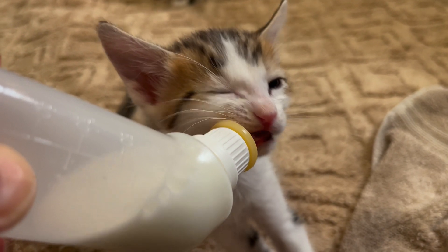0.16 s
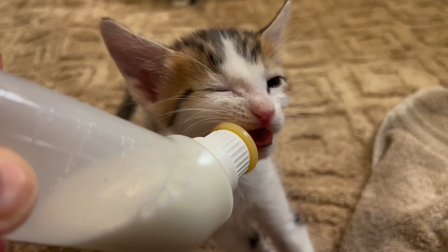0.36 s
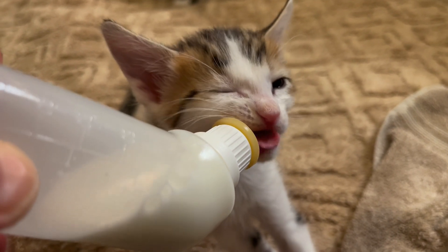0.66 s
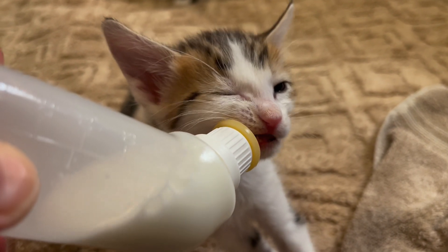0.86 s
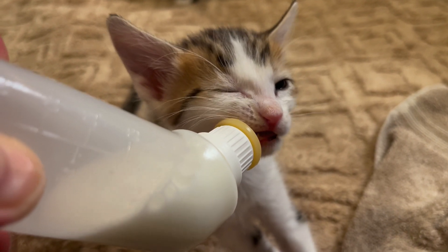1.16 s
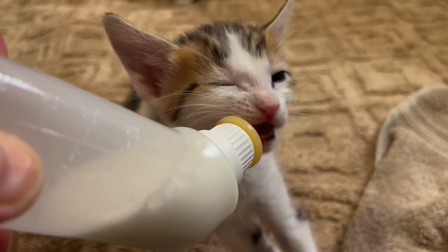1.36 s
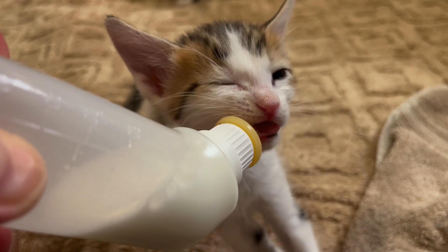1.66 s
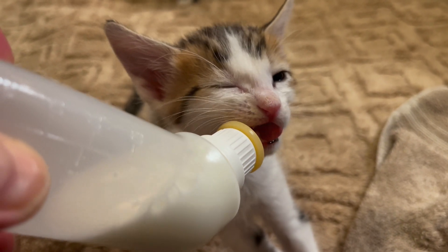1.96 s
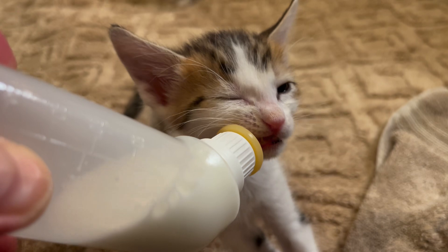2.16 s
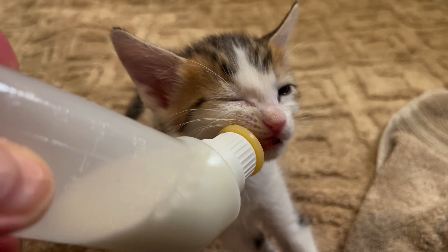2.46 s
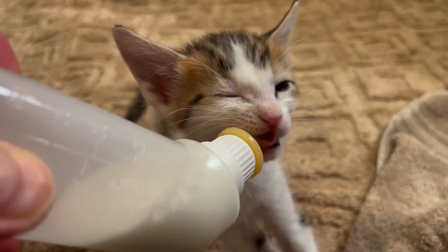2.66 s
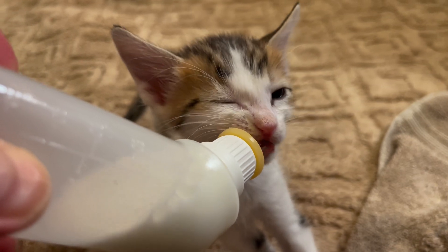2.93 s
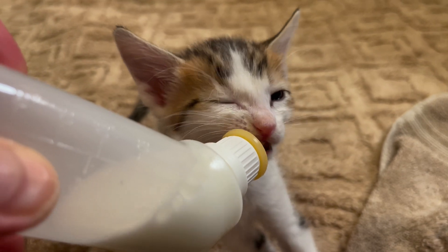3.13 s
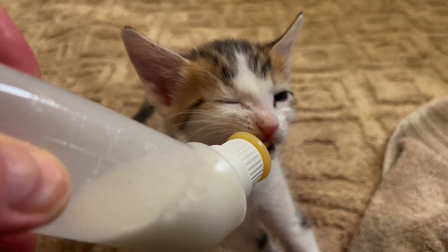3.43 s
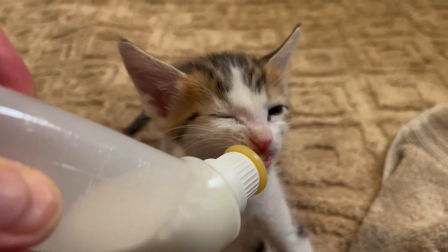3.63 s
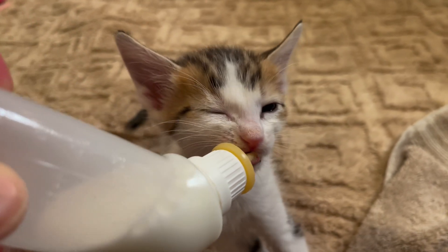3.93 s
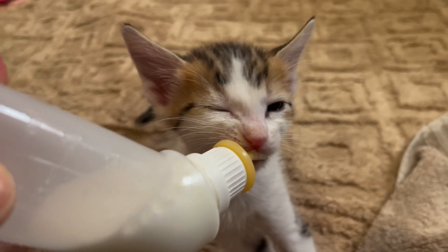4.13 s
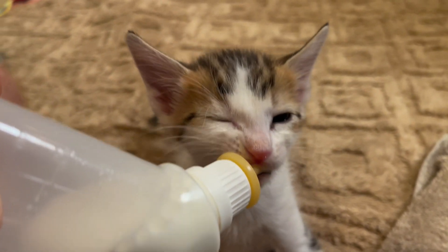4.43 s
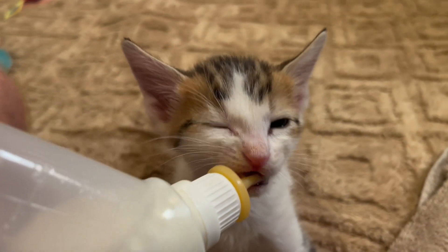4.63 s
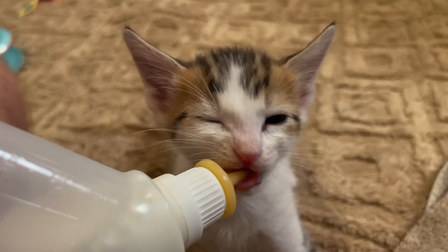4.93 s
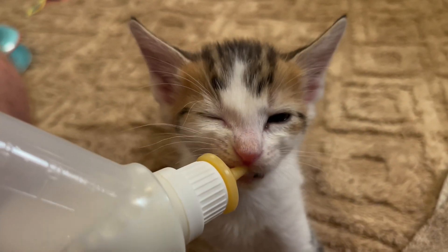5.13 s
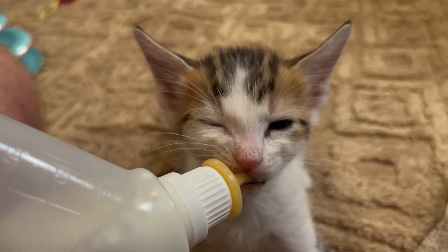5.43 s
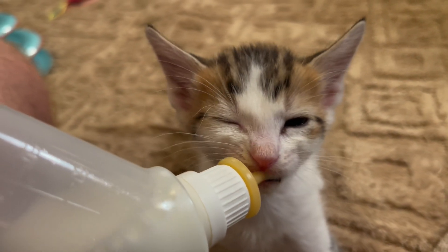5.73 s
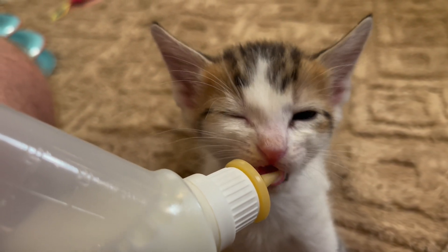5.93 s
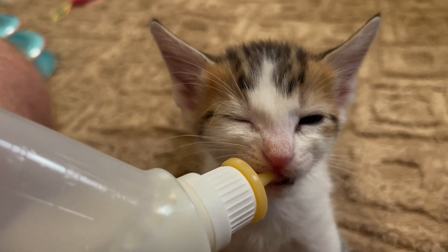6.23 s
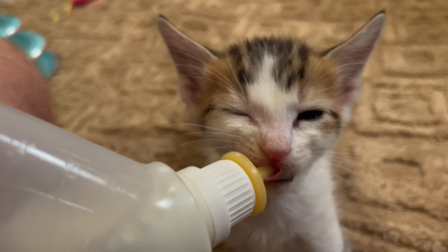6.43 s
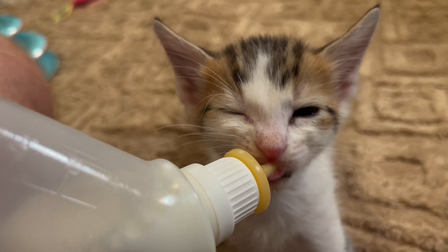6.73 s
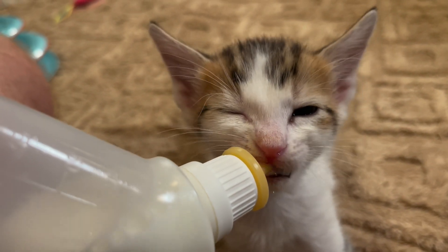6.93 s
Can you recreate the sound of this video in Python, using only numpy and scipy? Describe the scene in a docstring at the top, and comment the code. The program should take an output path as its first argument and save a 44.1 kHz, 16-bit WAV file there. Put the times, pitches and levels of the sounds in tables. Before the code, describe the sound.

Irregular bright lip snaps, brief wet squelches and small milky bubble pops from a nursing kitten, with faint handling rumble and appliance hum indoors.

```python
"""Kitten sucking on a rubber teat

Close to a two-port microphone, air squelches through the wet lips and their seal lets go with snaps.
Each burst rings lip gap, front and back of the mouth: shut lips click high and thin, parted lips let
the mouth sound. Smacks are falling rings, rubber pops and tongue bubbles short ones, squeaks narrow noise.
Sparse echoes follow; behind lie swells of handling noise, patchy room noise and an appliance's tones."""
import sys
import numpy as np
from scipy import signal
from scipy.fft import rfft, irfft, next_fast_len
from scipy.io import wavfile
from scipy.ndimage import uniform_filter1d

SR = 44100
rng = np.random.default_rng(int(sys.argv[2]) if len(sys.argv) > 2 else 0)


def dump(signal):
    """Clip the signal to [-1, 1] and save it as 16-bit WAV at the path in sys.argv[1]."""
    limited = np.clip(np.atleast_2d(signal).T, -1, 1)
    pcm = np.round(limited * 32767).astype(np.int16)
    wavfile.write(sys.argv[1], SR, pcm)


N = 312228
TIME = np.arange(N) / SR
HZ = np.fft.rfftfreq(N, 1 / SR)

# likeness of the diffuse sound at the two ports: (frequency [Hz], likeness [0-1])
PORT_LIKENESS = [(25, 0.54), (70, 0.4), (150, 0.8), (330, 0.7), (600, 0), (1700, 0.1), (2200, 0.3),
                 (5000, 0), (9000, 0.99)]
# each deeper cavity of the mouth answers a snap this much later
CAVITY_LAG_S = 0.0004
# ring of the rubber teat
TEAT_HZ = 3960


def amp(db):
    """Decibels to gain."""
    return 10 ** (np.asarray(db) / 20)


def unit(x):
    """Scales to an rms of 1."""
    return x / np.sqrt(np.mean(x ** 2) + 1e-20)


def read(points, hz):
    """Reads a table on a log-frequency axis."""
    f, value = np.transpose(points)
    return np.interp(np.log(hz + 1), np.log(f + 1), value)


def add(mix, s, sound):
    """Adds a sound to the mix at time s [s]."""
    part = mix[max(round(s * SR), 0):][:len(sound)]
    part += sound[:len(part)]


def drift(rate_hz):
    """Random wander of rms 1, mostly slower than rate_hz."""
    spectrum = rfft(rng.standard_normal(N))
    return unit(irfft(spectrum / (1 + (HZ / rate_hz) ** 4), N))


def thin(x, low_hz):
    """Takes away what lies below low_hz with a gentle high-pass."""
    sos = signal.butter(2, np.clip(low_hz, 100, 20000), "high", fs=SR, output="sos")
    return signal.sosfilt(sos, x)


def ring(hz, width, size=256):
    """A heavily damped cavity ring with a rounded start and energy 1; width in Hz."""
    t = np.arange(size) / SR
    wave = t ** 2 * np.exp(-np.pi * width * t) * np.sin(2 * np.pi * hz * t)
    wave = thin(wave, hz * 0.44)
    return wave / np.linalg.norm(wave)


def splinter(x, share, spread_s, count=6, size=400):
    """A wet film tears in steps: each burst is trailed by a few weaker ones, rms 1 over 2 ms."""
    at = rng.uniform(0.14, 1, count) * np.clip(spread_s, 0, (size - 1) / SR)
    sign = rng.choice([-1, 1], count)
    taps = np.zeros(size)
    taps[0] = 1
    taps[(at * SR).astype(int)] += share * sign * np.exp(-2 * at / spread_s)
    y = np.convolve(x, taps)
    return np.sqrt(0.002 * SR) * y / np.linalg.norm(y)


def cavities(strength_db, opening, lip_hz, front_hz, back_hz=2122, deepening=0.13, usual_db=-28):
    """(dB, Hz) of lip gap, front and back: the opening of the lips shares out the level."""
    # levels with the lips shut and parted: (lip gap [dB], front [dB], back [dB])
    shut_levels = [2, -24, -25]
    parted_levels = [-29, 1, -13.5]
    levels = [strength_db + shut + opening * (parted - shut)
              for shut, parted in zip(shut_levels, parted_levels)]
    # a hard sound reaches deeper: dB gained at the back for each dB above the usual strength
    levels[-1] += deepening * max(strength_db - usual_db, 0)
    return list(zip(levels, [lip_hz, front_hz, back_hz]))


def snaps(shares=(0.45, 0.7, 0.7), spread_s=0.0023, parted_narrowing=0.19):
    """The seal lets go: a burst rings three cavities in turn, with a throat knock and soft jaw thump."""
    # the seal lets go: (time [s], strength [dB], opening of the lips [0-1], lip gap [Hz],
    # front of the mouth [Hz])
    releases = [(0.0259, -16.5, 0.19, 10100, 5800), (0.0267, -15, 0.2, 10850, 6380),
                (0.1925, -35.5, 0.53, 9100, 7000), (0.3313, -21, 0.35, 10700, 5530),
                (0.333, -13.5, 0.06, 10860, 6900), (0.6166, -39, 0.33, 9860, 5900),
                (0.9593, -10, 0.16, 10930, 6460), (1.1324, -37.5, 0.34, 9800, 6550),
                (1.2755, -19, 0.13, 10750, 6400), (1.444, -43, 0.35, 8400, 5180),
                (1.5913, -33.5, 0.23, 10040, 5500), (1.6967, -25, 0, 11700, 6000),
                (1.914, -34, 0, 11000, 6840), (1.945, -33.5, 0.25, 9200, 5900),
                (1.955, -40, 0.5, 9600, 5530), (2.103, -36, 0.41, 9430, 6100), (2.336, -31, 0, 10700, 7000),
                (2.5943, -25, 0.16, 10060, 6960), (2.948, -48, 0.32, 10540, 6000),
                (3.3678, -28, 0.65, 10800, 6870), (3.373, -43, 0.6, 10000, 6800),
                (3.6234, -28, 0.34, 9470, 6800), (3.6897, -47, 0.58, 10000, 7000),
                (3.9305, -30, 0.01, 8050, 6480), (3.9345, -27.5, 0.2, 7840, 6480),
                (3.961, -34, 0.3, 6900, 6400), (3.968, -31, 0.63, 7760, 6120),
                (4.0962, -45.5, 0.24, 10800, 6500), (4.228, -29.5, 0.26, 10230, 7500),
                (4.588, -22.5, 0.56, 9970, 6950), (4.5905, -37, 0.5, 8200, 5500),
                (4.8548, -21.5, 0.22, 10220, 5900), (5.2514, -26, 0, 10200, 6500),
                (5.253, -22.5, 0.06, 10000, 6300), (5.547, -22.5, 0.59, 10400, 5700),
                (5.871, -31, 0, 9150, 6400), (5.8789, -33, 0.88, 9700, 7100),
                (6.161, -43.5, 0.1, 10500, 7100), (6.1964, -32, 0.2, 8800, 7400),
                (6.198, -31, 1, 8360, 6860), (6.43, -35.5, 1, 9700, 5270), (6.8558, -47, 0.3, 9000, 6200),
                (6.862, -18.5, 0.27, 10560, 6100), (7.0785, -11.5, 0.3, 9400, 6200)]
    # width of each cavity's ring with the lips shut: (lip gap [Hz], front [Hz], back [Hz])
    shut_widths = [2600, 3400, 2000]
    throat_hz, throat_width_hz, throat_db = 1320, 900, -50
    # the throat follows only a share of any change from the usual level at the back of the mouth
    throat_follows, usual_back_db = 0.77, -48.5
    jaw_hz, jaw_width_hz, jaw_db = 480, 600, -39
    out = np.zeros(N)
    for s, strength_db, opening, lip_hz, front_hz in releases:
        mouth = cavities(strength_db, opening, lip_hz, front_hz)
        # parted lips narrow the rings
        narrowing = np.clip(1 - parted_narrowing * opening, 0.3, 1.5)
        for depth, ((db, hz), width, share) in enumerate(zip(mouth, shut_widths, shares)):
            burst = splinter(ring(hz, width * narrowing), share, spread_s)
            add(out, s + depth * CAVITY_LAG_S, amp(db) * burst)
        back_db = mouth[-1][0]
        knock_db = throat_db + throat_follows * (back_db - usual_back_db)
        knock = splinter(ring(throat_hz, throat_width_hz), 0.6, spread_s)
        add(out, s + 2 * CAVITY_LAG_S, amp(knock_db) * knock)
        thump = splinter(ring(jaw_hz, jaw_width_hz), 0.2, spread_s)
        add(out, s, amp(strength_db + jaw_db) * thump)
    return out


def squelches(trim_db=(-1.0, -1.0, -2.5), teat_db=-22.5, fade_s=0.0018, count=700):
    """Air leaks past the teat: a dense run of bursting films rings cavities and rubber, gliding."""
    # leaks: (start [s], length [s], growth [dB], strength [dB], opening of the lips [0-1],
    # lip gap [Hz], front of the mouth [Hz], fall in pitch [share, negative rises])
    leaks = [(1.128, 0.12, -19, -53, 0.41, 8700, 6170, 0.14),
             (1.2697, 0.0082, -4, -22.5, 0.22, 9800, 6770, 0.16),
             (1.591, 0.011, -5, -39, 0.29, 10100, 5900, 0.25),
             (1.6937, 0.0043, 0, -26.5, 0.05, 10320, 6500, 0.25),
             (1.899, 0.016, 8, -36, 0.18, 10460, 6720, 0.053),
             (1.913, 0.05, -16, -36.5, 0.2, 10550, 6860, 0.12),
             (2.33, 0.0055, 15, -32.5, .03, 9630, 7060, 0.051),
             (2.5923, 0.0038, -3, -24.5, 0.28, 9700, 6800, 0.088),
             (3.081, 0.048, -11, -64.5, 0.45, 8400, 5500, 0.13),
             (3.3653, 0.0063, 0.5, -28, 0.48, 10180, 6870, .1),
             (3.9261, 0.042, -2, -32, 0.29, 7480, 6500, 0.2),
             (4.573, 0.015, 20, -35.5, 0.7, 8870, 6740, -0.23),
             (4.8495, 0.003, 3.5, -32, 0.54, 10200, 5800, 0.22),
             (5.229, 0.027, 14.5, -30.5, 0.05, 9850, 6640, 0.15),
             (5.5387, 0.0074, 3, -27.5, 0.42, 10300, 6650, 0.08),
             (5.852, 0.029, 2.5, -32.5, 0.12, 9380, 6500, 0.089),
             (5.877, 0.015, -10, -37, 0.37, 9170, 6320, 0.091),
             (6.1594, 0.043, 8.5, -33, 0.4, 8900, 6900, 0.2),
             (6.424, 0.0086, 6, -33.5, 0.69, 9130, 5100, .18),
             (6.86, 0.0026, 3, -20.5, 0.23, 10000, 6430, 0.027)]
    # ring widths: (lip gap [Hz], front [Hz], back [Hz], rubber teat [Hz], fizz of milk [Hz])
    leak_widths = [2700, 2700, 2400, 1700, 1700]
    fizz_db, parted_fizz_db, fizz_hz = -10, -14, 11200
    median_gap_s, uneven_db, scatter = 1 / 4200, 4.3, 0.06
    out = np.zeros(N)
    for start, length, growth_db, strength_db, opening, lip_hz, front_hz, sag in leaks:
        length = max(length, 0.002)
        step, size, *detune = rng.standard_normal((count, 7)).T
        # each burst's place in the run, from 0 at its start to 1 at its end
        place = np.cumsum(np.exp(0.56 * step)) * median_gap_s / length
        place = place - place[0]
        within = place < 1
        place = place[within]
        # swells in from about a quarter of full level, and dies out the same way
        fade = np.minimum(0.26 + np.minimum(place, 1 - place) * length / fade_s, 1)
        strength = fade * amp(growth_db * place + uneven_db * size[within])
        t = np.arange(int(length * SR) + 128) / SR
        age = np.maximum(t - length * place[:, None], 0)
        mouth = cavities(strength_db, opening, lip_hz, front_hz)
        rings = [(db + trim, hz) for (db, hz), trim in zip(mouth, trim_db)]
        rings.append((strength_db + teat_db, TEAT_HZ))
        rings.append((strength_db + fizz_db + opening * parted_fizz_db, fizz_hz))
        for (db, hz), width, off in zip(rings, leak_widths, detune):
            pitch = hz * np.exp(scatter * off[within] - sag * (place - 0.5))[:, None]
            bursts = age ** 2 * np.exp(-np.pi * width * age) * np.sin(2 * np.pi * pitch * age)
            run = thin(strength @ bursts, hz * 0.5)
            # db is the level over the length of the leak, without the last ring-out
            add(out, start, amp(db) * np.sqrt(length * SR / len(run)) * unit(run))
    # soft wet films do not reach the very top of the treble
    return signal.sosfilt(signal.butter(8, 12500, fs=SR, output="sos"), out)


def smacks(from_hz=3600, to_hz=850, fall_s=0.0011, decay_s=0.0009):
    """The mouth comes open with a low smack: its ring drops quickly as the cavity grows."""
    # smacks: (time [s], level [dB])
    openings = [(0.0261, -40), (0.3346, -46.5), (2.5957, -54.5), (3.3735, -44), (3.9682, -41), (4.591, -47),
                (4.856, -48), (5.2542, -49.5), (5.5486, -62), (6.1992, -54), (6.433, -52), (6.864, -44)]
    out = np.zeros(N)
    t = np.arange(SR // 100) / SR
    hz = to_hz + (from_hz - to_hz) * np.exp(-t / fall_s)
    wave = t * np.exp(-t / decay_s) * np.sin(2 * np.pi * np.cumsum(hz) / SR)
    for s, db in openings:
        add(out, s, amp(db) * splinter(wave, 0.16, 0.0026))
    return out


def teat(width_hz=800):
    """The rubber teat springs back on the hardest snaps with short damped pops."""
    # pops: (time [s], level [dB])
    pops = [(0.0251, -41), (0.3333, -40), (0.9586, -32.5), (1.277, -41), (2.5943, -50)]
    out = np.zeros(N)
    for s, db in pops:
        add(out, s, amp(db) * splinter(ring(TEAT_HZ, width_hz), 0.1018, 0.001))
    return out


def tongue(width_share=0.81, round_below_hz=2700, count=110):
    """Single bubbles pop around the tongue, low ones rounder, over a faint random crackle of milk."""
    # clearest bubbles, between sucks or with a hard snap: (time [s], level [dB], pitch [Hz])
    bubbles = [(0.0262, -34.5, 2220), (.149, -57, 4200), (.265, -45.5, 2020), (0.3336, -44.5, 1400),
               (.462, -64, 4000), (.502, -56.5, 6500), (0.54, -62, 6830), (.569, -61, 4200),
               (0.6618, -55, 6110), (0.84, -59, 5660), (.912, -62, 3900), (0.9603, -42, 1700),
               (1.01, -47.5, 2346), (1.515, -57.5, 2920), (1.749, -56, 9530), (1.764, -54.5, 10500),
               (1.985, -60, 11000), (2.065, -63, 4400), (2.074, -55, 4300), (2.187, -60.5, 2210),
               (2.43, -59, 3830), (2.498, -56, 10550), (2.682, -55.5, 2360), (2.778, -64, 4400),
               (2.804, -57, 4690), (3.339, -63.5, 10450), (3.4862, -54.5, 8300), (3.6864, -43.5, 1890),
               (4.105, -57.5, 6000), (4.148, -52, 3150), (4.425, -58.5, 2595), (4.476, -60, 3000),
               (4.588, -44.5, 3630), (4.699, -60, 9060), (4.762, -62.5, 3910), (5.048, -62.5, 7430),
               (5.121, -50, 2720), (5.389, -59.5, 6680), (5.94, -61.5, 7555), (6.562, -65, 3680),
               (6.63, -59.5, 10500), (6.693, -59, 2960), (6.757, -58.5, 8500), (6.864, -50.5, 7400),
               (6.938, -62.5, 6300), (7.006, -64.5, 4070), (7.027, -57.5, 2590)]
    crackle_db, uneven_db = -77.0, 5.5
    low_hz, high_hz, crackle_width_hz = 3500, 11000, 3200
    out = np.zeros(N)
    for s, db, hz in bubbles:
        width = width_share * hz * min(hz / round_below_hz, 1)
        add(out, s, amp(db) * splinter(ring(hz, width), 0.7, 0.0075))
    for when, pitch, size in rng.random((count, 3)):
        hz = low_hz * (high_hz / low_hz) ** pitch
        tick = splinter(ring(hz, crackle_width_hz), 0.49, 0.0056)
        # a few ticks stand well above the rest
        add(out, when * N / SR, amp(crackle_db - uneven_db * np.log(size + 0.041)) * tick)
    return out


def squeaks(sag=0.04):
    """Faint whistly squeaks from the muzzle: narrow noise that sputters and sinks a little in pitch."""
    # squeaks: (start [s], length [s], level before sputter [dB], middle pitch [Hz])
    whistles = [(0.189, 0.11, -74, 5200), (0.404, 0.084, -77, 5520), (0.578, 0.024, -77.5, 7060),
                (1.134, .06, -66.5, 5260), (2.337, .076, -70, 5250), (2.924, 0.067, -74.5, 3360),
                (3.086, 0.14, -75.5, 5150), (3.409, 0.16, -70.5, 4880), (4.306, 0.042, -78, 5940),
                (4.461, 0.015, -72, 5640), (4.916, 0.066, -69.5, 4840), (5.313, 0.016, -68.5, 6400),
                (5.504, 0.025, -68, 4860), (5.683, 0.053, -68.5, 4930), (6.379, 0.049, -68.5, 5200)]
    out = np.zeros(N)
    smooth = signal.butter(2, 330, fs=SR, output="sos")
    sputter = unit(amp(4 * drift(150)))
    for s, length, db, hz in whistles:
        u = np.linspace(0, 1, int(length * SR))
        fuzz = signal.sosfilt(smooth, rng.standard_normal((len(u), 2)) @ [1, 1j])
        turn = np.exp(2j * np.pi * np.cumsum(hz * (1 - sag * (u - 0.5))) / SR)
        swell = np.sin(np.pi * np.sqrt(u))
        add(out, s, amp(db) * unit((fuzz * turn).real * swell))
    return out * sputter


def match_ports(z, hz):
    """Mixes some of the left port's noise into the right, as alike as the table says."""
    same = np.clip(read(PORT_LIKENESS, hz), 0, 1)[:, None]
    z[1] = same * z[0] + np.sqrt(1 - same ** 2) * z[1]


def room(x, gap_s=0.002, lumpy_db=3, near_db=4, near_s=0.022):
    """Sparse clumped echoes, strongest from nearby things; bands die apart and carpet soaks up the top."""
    # echo: (frequency [Hz], time to fall by 60 dB [s], relative starting level [dB])
    echo_bands = [(497.3, 0.24, 1.5), (2200, 0.26, -1), (4005, 0.2, 1), (7156, 0.23, -0.5),
                  (8800, 0.34, 0.5), (10300, 0.18, -5.5), (11440, 0.27, -5), (14000, 0.13, -10.5)]
    t = TIME[:SR]
    taps = rng.choice([-1.0, 1.0], (2, SR)) * (rng.random((2, SR)) < 0.15) * (t > gap_s)
    taps = taps * amp(lumpy_db * drift(160)[:SR] + near_db * np.exp(-(t / near_s) ** 2))
    hz, frame_s, z = signal.stft(taps, SR, nperseg=256)
    match_ports(z, hz)
    bands, *columns = np.transpose(echo_bands)
    t60, colour_db = (np.interp(hz, bands, column)[:, None] for column in columns)
    tail = signal.istft(z * amp(colour_db - 60 * frame_s / t60), SR, nperseg=256)[1]
    return signal.fftconvolve(x[None], tail / np.linalg.norm(tail[0]), axes=1)[:, :N]


def hand(rumble_hz=90, rumble_octaves=0.85, rub_hz=380, rub_octaves=0.71):
    """Each shift of the grip is a smooth swell of dull handling noise: a low rumble and a soft rub."""
    # grips: (middle [s], length [s], rumble peak level [dB], rub peak level [dB])
    grips = [(0.104, 0.23, -55, -63), (0.706, 0.2, -52.5, -60), (1.146, .25, -56.5, -70),
             (2.095, 0.31, -64, -60.5), (2.914, 0.075, -45, -75), (3.181, 0.15, -43, -61.5),
             (3.849, 0.46, -55.5, -70.5)]

    def band(hz, octaves):
        """Noise of rms 1 in a bell-shaped band."""
        bell = np.exp(-(np.log2((HZ + 1) / hz) / octaves) ** 2)
        return unit(irfft(rfft(rng.standard_normal(N)) * bell, N))

    rumble, rub = band(rumble_hz, rumble_octaves), band(rub_hz, rub_octaves)
    out = np.zeros(N)
    for s, length, rumble_db, rub_db in grips:
        swell = np.exp(-(2 * (TIME - s) / length) ** 2)
        out += swell * (amp(rumble_db) * rumble + amp(rub_db) * rub)
    return out


def air(level_db=-51, patchy_db=1.9):
    """Room noise whose level drifts in patches of time and pitch, partly alike at the two ports."""
    # room noise: (frequency [Hz], relative density [dB per Hz])
    noise_colour = [(20, -41), (45, -13.5), (72, -0.5), (100, -4.5), (150, -11.5), (200, -6), (310, -16.5),
                    (700, -22), (1600, -29.5), (1950, -24), (2500, -41), (5000, -48), (11000, -47),
                    (14000, -68.5)]
    hz, _, z = signal.stft(rng.standard_normal((2, N)), SR, nperseg=4096, noverlap=3072)
    match_ports(z, hz)
    patches = uniform_filter1d(rng.standard_normal(z.shape[1:]), size=14, axis=0)
    patches = unit(uniform_filter1d(patches, size=4, axis=1))
    z *= amp(read(noise_colour, hz)[:, None] + patchy_db * patches)
    noise = signal.istft(z, SR, nperseg=4096, noverlap=3072)[1][:, :N]
    return amp(level_db) * unit(noise)


def appliance(whine_phase=2.27, beat_hz=13, beat_db=(-11, -8)):
    """Hum and thin beating whine, wavering; standing waves put the whine out of step at the ports."""
    # steady tones: (frequency [Hz], level before waver [dB], wander [Hz])
    hum_tones = [(59.5, -68.5, .1), (73, -64.5, .6), (119.86, -54, .5), (136.9, -68, 0.89),
                 (181.2, -63.5, 0.92), (362, -80, 0.63), (481, -79, 0.81), (751, -77, .3),
                 (1993, -79.5, 0.98)]
    # whine: (time [s], level of its main tone before waver [dB])
    whine_levels = [(0, -72.5), (3, -71.5), (3.6, -67), (5.7, -65.5), (7.08, -67)]
    whine_hz, whine_wander_hz = 1830, 4.5
    waver_db, waver_hz, wander_rate_hz = 2.4, 6, 6.9

    def tone(hz, db, wander_hz):
        """A complex tone of wavering level and wandering pitch."""
        level = np.sqrt(2) * amp(db + waver_db * drift(waver_hz))
        pitch = hz + wander_hz * drift(wander_rate_hz)
        return level * np.exp(2j * np.pi * np.cumsum(pitch) / SR)

    level_db = np.interp(TIME, *np.transpose(whine_levels))
    # weaker neighbours below and above make the whine beat
    whine = sum(tone(whine_hz + k * beat_hz, level_db + db, whine_wander_hz)
                for k, db in zip((0, -1, 1), (0, *beat_db)))
    hum = sum(tone(*row) for row in hum_tones)
    return (hum + whine * np.exp(1j * whine_phase * np.array([[0], [1]]))).real


def scene(tail_db=-22):
    """The mouth close by, its echo, and the room behind it."""
    mouth = snaps() + squelches() + smacks() + teat() + tongue() + squeaks()
    return mouth + amp(tail_db) * room(mouth) + air() + hand() + appliance()


def record(dry, edge_hz=16400):
    """Microphone colour, a fixed phase and level between the left and right channels, and the band limit."""
    # colour of the microphone: (frequency [Hz], gain [dB])
    mic_colour = [(700, -1), (2200, -4.5), (3200, -4), (4100, 1), (4900, -1.5), (5600, 0.5), (9000, -0.5),
                  (11500, 1.5), (12700, -7), (16000, -11.5)]
    # phase by which the left channel leads, the same for every sound: (frequency [Hz], phase [radians])
    channel_phase = [(20, 0), (400, .2), (900, 1.2), (1500, 1), (2000, 0), (3000, .9), (3400, 5.5),
                     (4500, 6.9), (5200, 9.8), (6000, 12.4), (6800, 12.7), (7400, 13.9), (8600, 12.6),
                     (10200, 9.45), (12000, 6.3), (15000, 0)]
    # left minus right: (frequency [Hz], level [dB])
    port_balance = [(60, -1), (110, 0.5), (200, -0.5), (360, 0.5), (640, 1.5), (1170, -3), (2110, 0),
                    (3820, 2.5), (6910, 1.5), (12500, -0.5)]
    size = next_fast_len(N + SR)
    hz = np.fft.rfftfreq(size, 1 / SR)
    # each channel takes half of the phase and level between them
    side = np.array([[0.5], [-0.5]])
    phase = side * np.interp(hz, *np.transpose(channel_phase))
    ports = np.exp(1j * phase) * amp(side * read(port_balance, hz))
    heard = irfft(rfft(dry, size) * ports * amp(read(mic_colour, hz)), size)[:, :N]
    band_limit = signal.firwin(511, edge_hz, window=("kaiser", 9), fs=SR)
    return signal.oaconvolve(heard, band_limit[None], "same")


dry = scene()
out = record(dry)
dump(out)
```